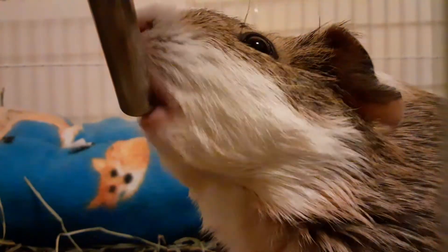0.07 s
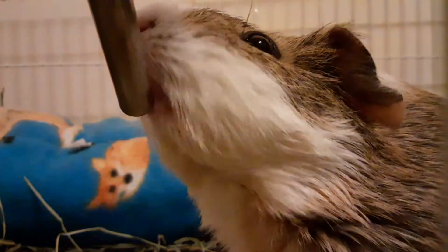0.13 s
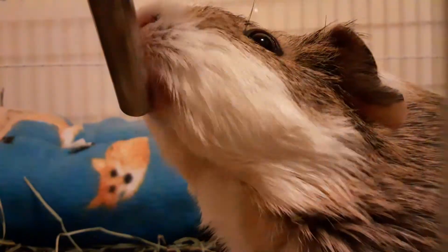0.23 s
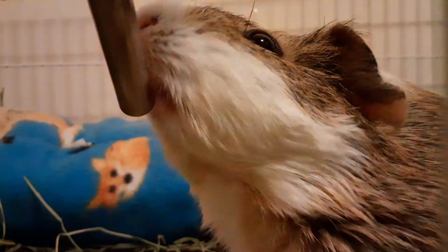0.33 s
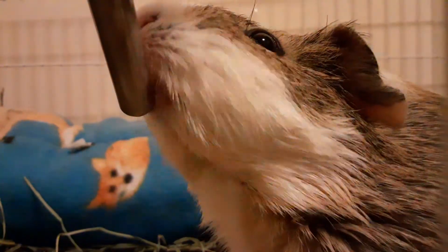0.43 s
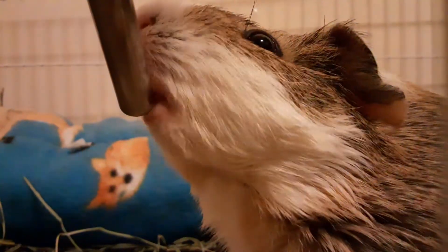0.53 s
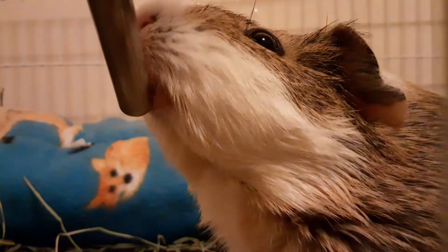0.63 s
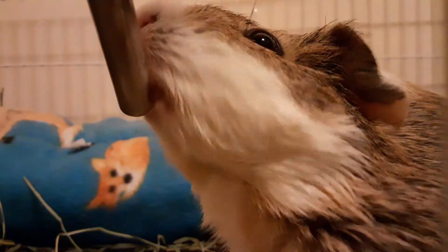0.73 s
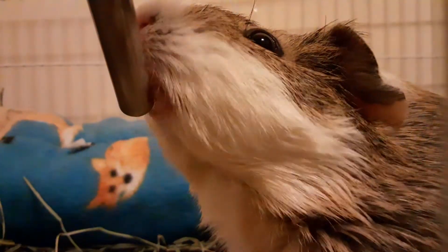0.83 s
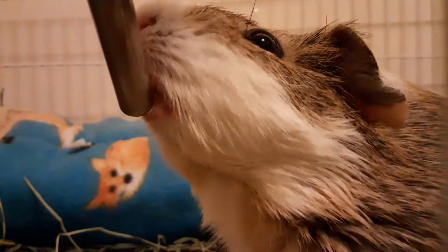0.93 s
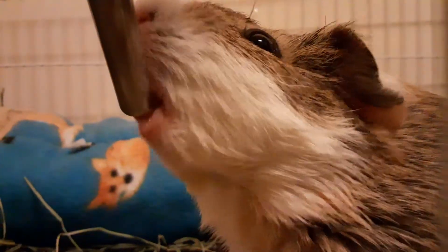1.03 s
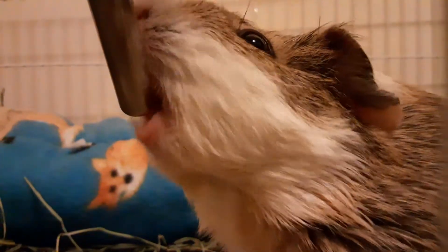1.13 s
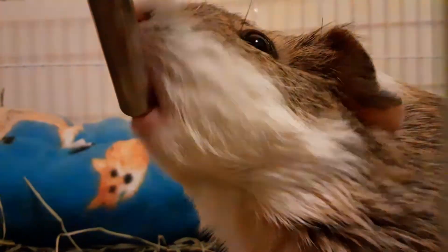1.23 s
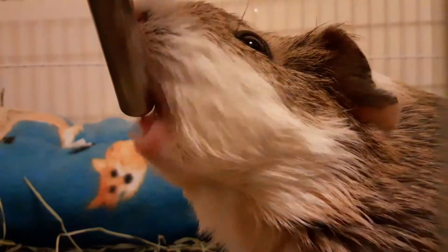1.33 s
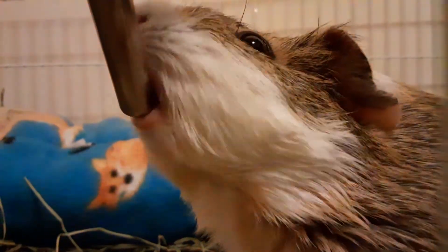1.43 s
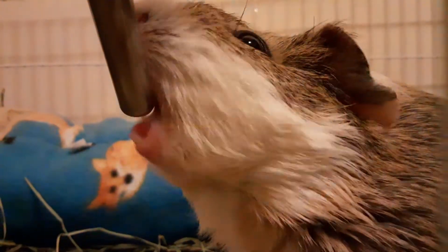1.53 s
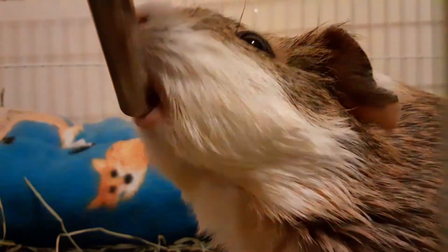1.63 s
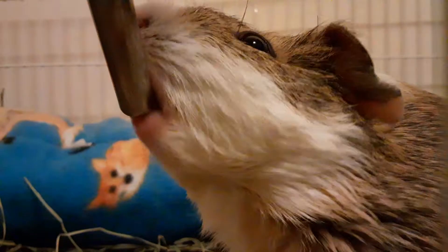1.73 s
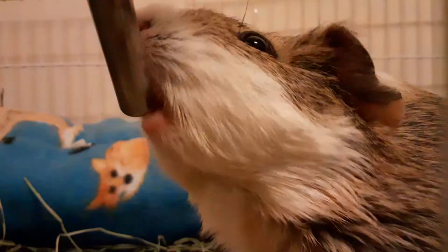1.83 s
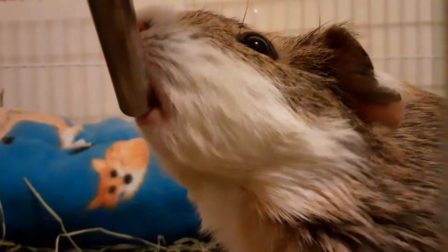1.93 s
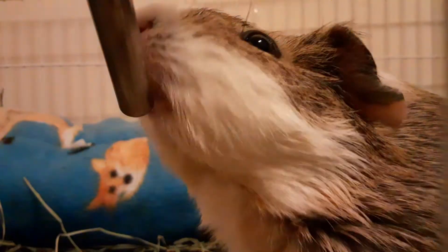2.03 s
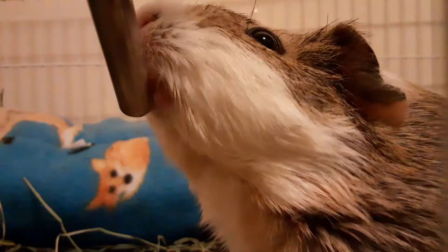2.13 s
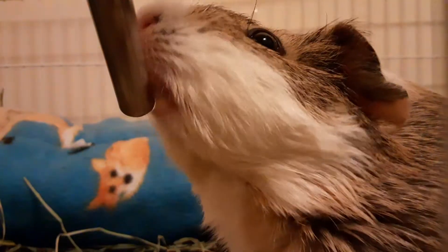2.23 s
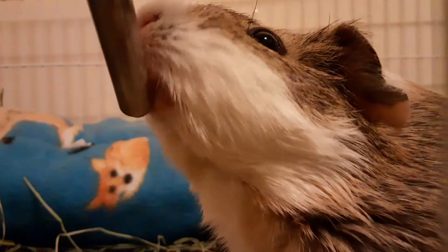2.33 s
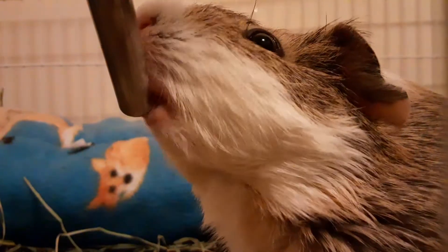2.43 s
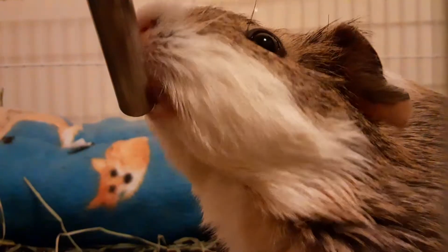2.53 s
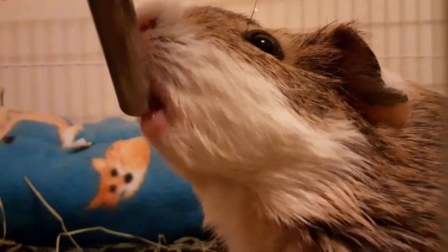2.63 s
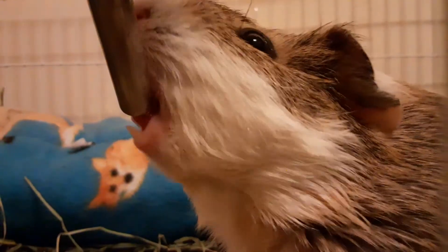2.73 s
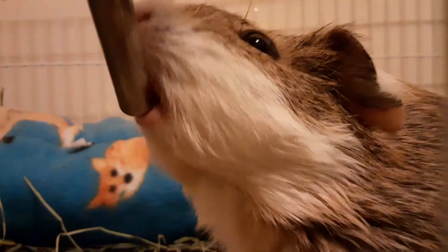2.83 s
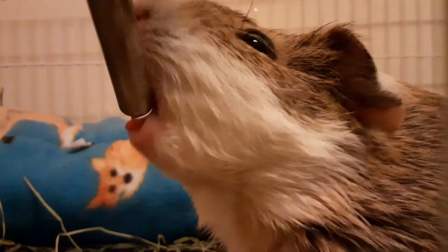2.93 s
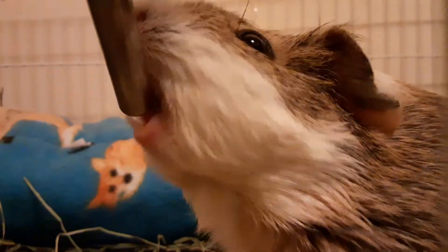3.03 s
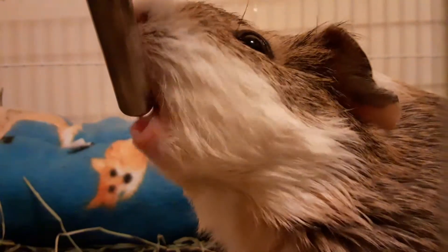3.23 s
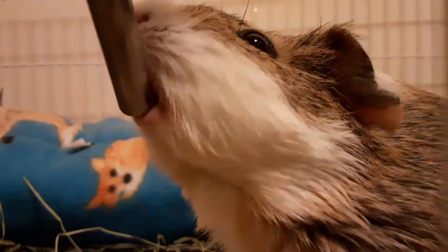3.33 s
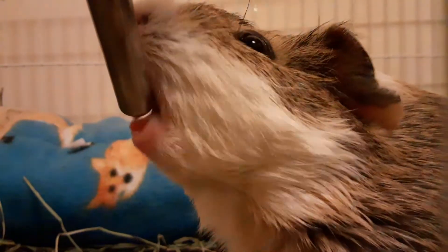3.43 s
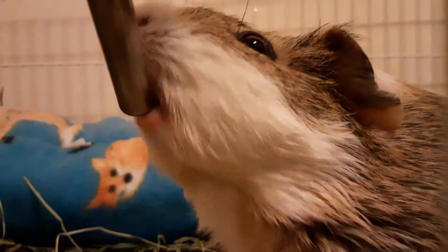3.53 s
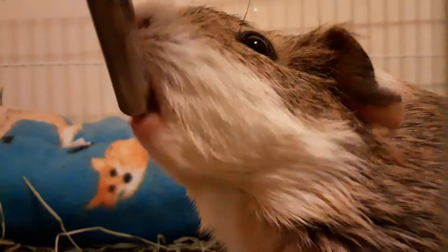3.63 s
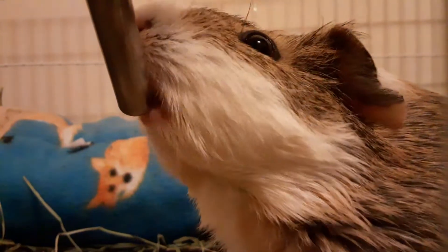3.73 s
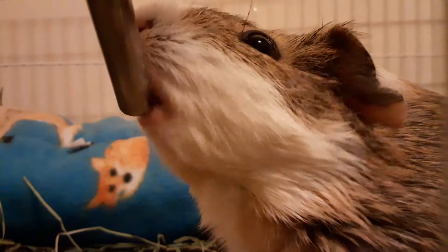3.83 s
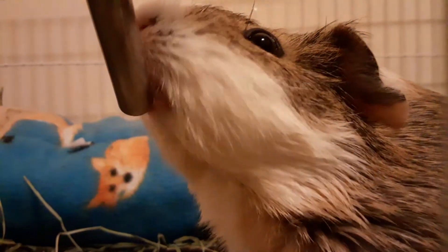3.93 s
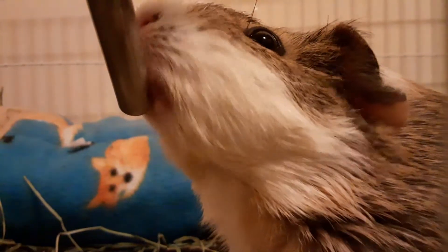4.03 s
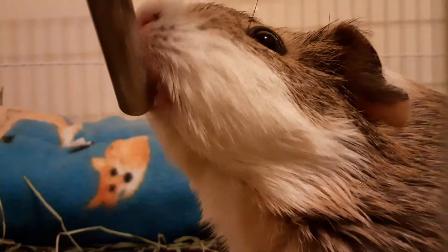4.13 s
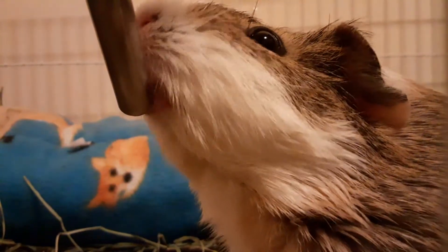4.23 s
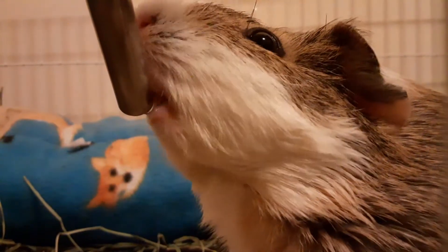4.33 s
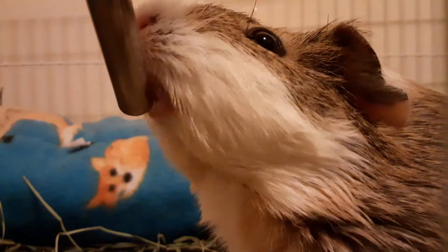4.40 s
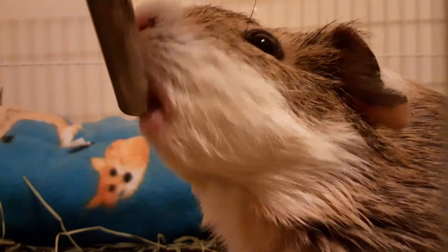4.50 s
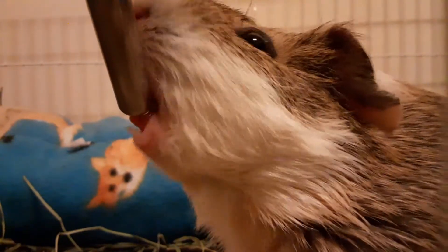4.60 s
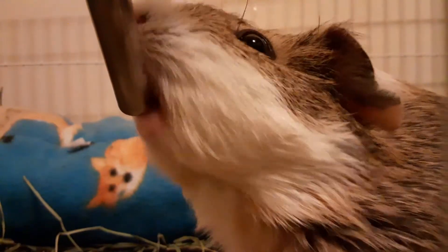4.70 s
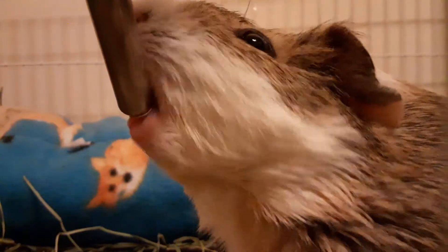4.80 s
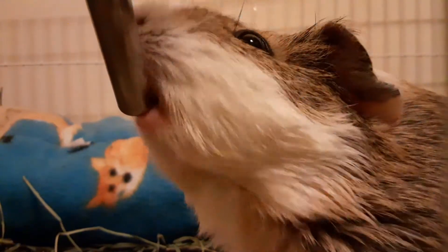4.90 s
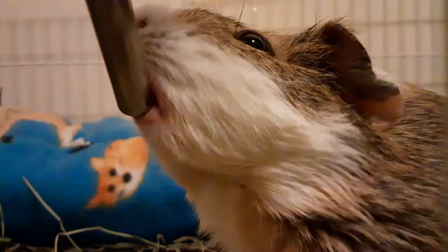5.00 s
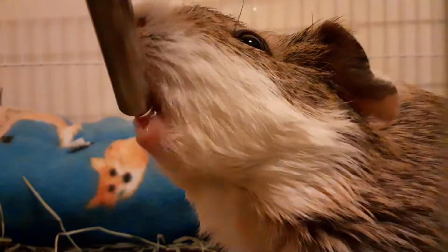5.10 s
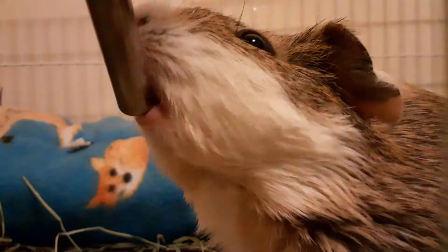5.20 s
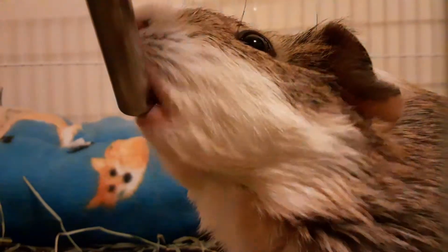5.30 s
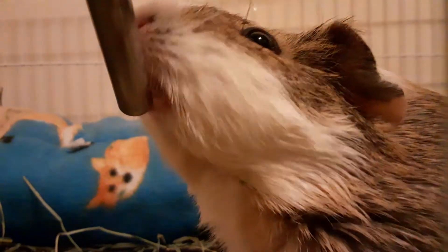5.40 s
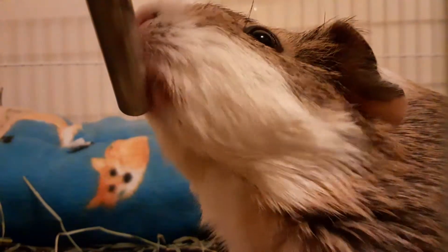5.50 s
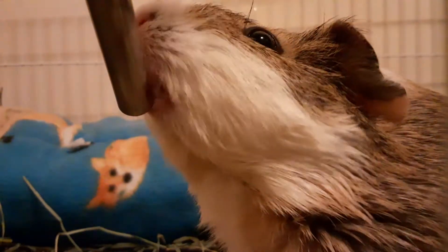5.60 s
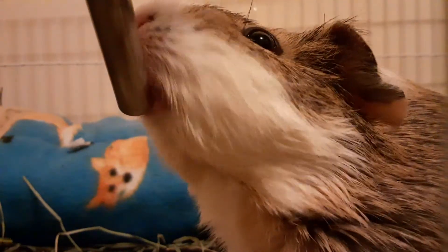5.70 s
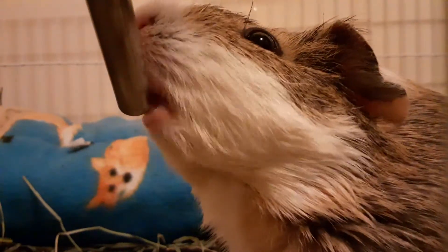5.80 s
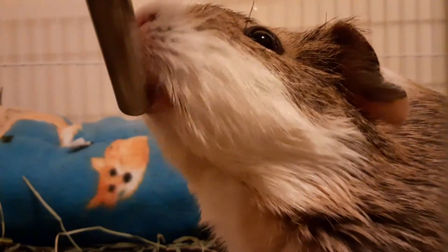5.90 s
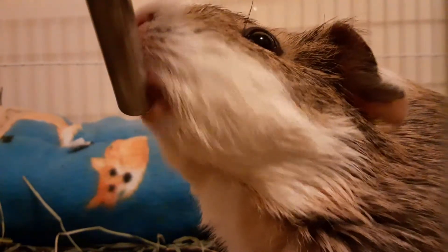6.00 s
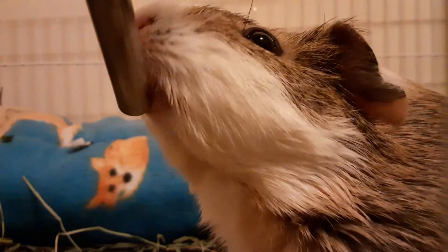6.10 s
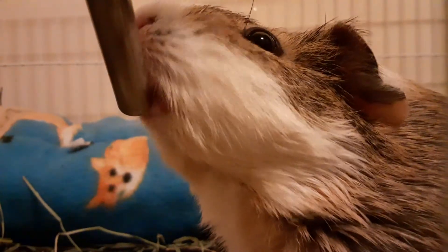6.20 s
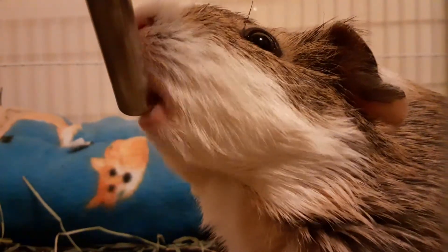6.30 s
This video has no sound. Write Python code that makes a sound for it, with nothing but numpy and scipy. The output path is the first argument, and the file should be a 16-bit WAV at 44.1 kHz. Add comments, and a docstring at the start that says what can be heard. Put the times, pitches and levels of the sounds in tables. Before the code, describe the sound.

A guinea pig drinks from the steel spout of a water bottle in its cage, close and slightly left, in a small quiet room with faint steady room tone. A few light ticks sound right at the start. From about 1.1 to 2 seconds comes a burst of rapid clicking, around nine strokes a second: wet licks lift the valve ball, which rattles and snaps shut, while strokes in between knock the spout with sharp double clacks. Tiny high bubble pings mix in, and the cage hums faintly after each contact. After a pause, a second burst runs from 2.8 to 3.8 seconds. A very faint hiss and a few soft, low bumps on the cage floor follow between 3.8 and 4.5 seconds. A third, shorter burst lasts from 4.7 to 5.2 seconds. A few last ticks trail off by 5.4 seconds, with one barely audible tick near 6 seconds.

```python
"""A guinea pig drinks from the steel spout of a water bottle in its cage, nearer the left microphone.
In a small quiet room, mouth and valve ball tick, and the cage hums after each contact. From 1.1 s come
three bursts of about nine strokes a second: wet licks lift the ball, which rattles and falls shut,
tiny bubbles ping, and strokes between the licks knock the spout with a double clack. A faint hiss and
soft bumps on the cage floor follow the second burst; after the third, a few last ticks remain."""
import sys
import numpy as np
from scipy import signal
from scipy.fft import rfft, irfft, next_fast_len
from scipy.io import wavfile

SR = 44100
rng = np.random.default_rng(int(sys.argv[2]) if len(sys.argv) > 2 else 0)


def generate_wav(sig):
    """Save sig (samples, or channels by samples) to the path in sys.argv[1] as 16-bit PCM at SR."""
    pcm = np.round(np.clip(np.atleast_2d(sig).T, -1, 1) * 32767).astype(np.int16)
    wavfile.write(sys.argv[1], SR, pcm)


N = 280035
AGE = np.arange(SR // 6) / SR  # seconds since a contact
GRID_HZ = np.fft.rfftfreq(8192, 1 / SR)

# licks, with delays counted from the push that lifts the ball:
# start_s, push_db, thud_db, rattle_delay_s, rattle_db, seat_delay_s, seat_db, film_length_s, film_db
LICKS = [(1.1648, 6.5, -6, .0143, -1, .0313, 2, .065, -42),
         (1.388, 6.5, -7, .012, -5, .0339, 1, .055, -41.5),
         (1.5982, 2.5, -9, .0162, -7, .0275, -6.5, .12, -43.5),
         (1.8355, 4, -7, .0114, -11, .0289, -5, .09, -45), (2.801, 5, -7.5, .0151, 1, .0317, 1, .12, -48),
         (3.0601, 2, -6, .0125, -8, .03, -20, .075, -42), (3.2818, 3, -6, .017, -2, .0292, 1.5, .12, -51),
         (3.5085, 3, -7, .014, -22, .0378, -1.5, .12, -56),
         (3.7063, 0, -11, .019, -10, .0365, -10, .095, -40.5),
         (4.6941, .5, -6.5, .0101, -3, .0303, 1, .035, -50),
         (4.8902, 4.5, -4, .0142, -2, .0289, 2, .12, -55), (5.1603, 3, -6, .0131, -8, .0369, 0, .07, -60)]
# resonances of spout and holder: pitch_hz, width_hz, rise_db
SPOUT_MODES = [(1035, 50, 7), (1370, 70, 8), (1560, 70, 4), (1725, 60, 6), (1950, 110, 6), (2540, 100, 6),
               (2950, 35, 6), (3125, 60, 7), (3225, 40, 6), (3560, 130, 5), (4040, 60, 4), (4230, 130, 4),
               (4470, 60, 5), (4760, 100, 4), (5080, 60, 4), (5450, 90, 7), (6060, 60, 7), (6370, 80, 6),
               (6580, 70, 5), (6870, 100, 4), (7600, 130, 3), (8640, 130, 6)]
# the steel tube's close pair of modes: pitch_hz, width_hz, level_db
TUBE_MODES = [(10180, 170, -3), (10390, 110, 0)]
# spectrum of a bright snap on steel: frequency_hz, level_db
SNAP_SPECTRUM = [(3000, -32.5), (7000, -7), (9500, -4.5), (11150, -7.5), (11800, -5), (12500, -11.5),
                 (13200, -1.5), (14100, 1), (14700, -5), (15600, -2), (16500, -12)]
# spectrum of a light tap on the spout: frequency_hz, level_db
TAP_SPECTRUM = [(30, -26), (70, -8.5), (200, 1), (950, -5.5), (1200, -3), (1450, 4.5), (2000, 1), (2650, 0),
                (3500, -2.5), (5000, -4), (7000, -7), (11500, -17.5)]


def amp(db):
    """Decibels to amplitude ratio."""
    return 10 ** (np.asarray(db) / 20)


def unit_rms(x):
    """Normalisation to rms 1."""
    return x / np.sqrt(np.mean(x ** 2) + 1e-20)


def unit_energy(x):
    """Normalisation to energy 1."""
    return x / np.sqrt(np.sum(x ** 2) + 1e-20)


def curve_at(points, hz):
    """Interpolation of (frequency_hz, value) points on a logarithmic frequency axis."""
    frequencies, values = np.transpose(points)
    return np.interp(np.log(hz + 1), np.log(frequencies), values)


def add(track, start_s, sound):
    """Superposition: a stereo sound is summed into a track."""
    part = track[:, max(0, round(start_s * SR)):][:, :sound.shape[1]]
    part += sound[:, :part.shape[1]]


def through(x, response):
    """Convolution of a stereo sound with an impulse response."""
    return signal.oaconvolve(x, response[None], axes=1)[:, :x.shape[1]]


def colour(spectrum, resonances=()):
    """Minimum-phase impulse response of a broad spectrum with resonant peaks on it."""
    peaks_db = sum(db / (1 + (2 * (GRID_HZ - hz) / width) ** 2) for hz, width, db in resonances)
    cepstrum = irfft(np.log(amp(curve_at(spectrum, GRID_HZ) + peaks_db)))
    half = len(cepstrum) // 2
    cepstrum[1:half] *= 2  # folding the cepstrum makes the response causal
    cepstrum[half + 1:] = 0
    return unit_energy(irfft(np.exp(rfft(cepstrum)))[:half])


def ringing(modes):
    """Modal impulse response: damped sinusoids of alternating sign, the wider ones dying sooner."""
    return unit_energy(sum(
        (-1) ** k * amp(db) * width * np.exp(-np.pi * width * AGE) * np.sin(2 * np.pi * hz * AGE)
        for k, (hz, width, db) in enumerate(modes)))


def reflections(t60, attack_s):
    """Diffuse field: uneven reflections build up, then decay exponentially."""
    swarm = rng.standard_normal((2, len(AGE))) * amp(5 * rng.standard_normal((2, len(AGE))))
    return unit_energy(swarm * amp(-60 * AGE / t60) * (1 - np.exp(-AGE / attack_s)))


def contact(scatter_db, scatter_t60, right_db, room_db, room_t60):
    """An impulse arrives as direct sound, scatter from nearby surfaces and reverberation."""
    near = amp(scatter_db) * reflections(scatter_t60, attack_s=0.0001)
    near[0, 2] += 1  # only the left microphone faces the spout
    shaded = 0.3 * near[0] + 1.15 * near[1]
    near[1] = amp(right_db) * np.pad(shaded, (12, 0))[:len(AGE)]  # 12 samples later on the right
    return unit_energy(near) + amp(room_db) * reflections(room_t60, attack_s=0.002) * amp([[1], [-1]])


def room_tone(level_db=-54):
    """Partly coherent noise: a steady low room sound with thin microphone hiss on top."""
    # noise floor: frequency_hz, level_db
    spectrum = [(30, -29), (55, -11), (130, -5.5), (260, -4.5), (345, 2.5), (410, -4), (620, -7.5),
                (1150, -13), (1750, -8.5), (4500, -24), (7500, -38), (9600, -35.5), (12000, -24),
                (15700, -21)]
    # likeness of left and right: frequency_hz, correlation
    coherence = [(60, 0.67), (130, 0.86), (290, 0.49), (640, 0.19), (1400, -0.13), (3000, -0.029)]
    # stereo balance: frequency_hz, left_minus_right_db
    balance = [(60, 6.5), (200, 1.5), (700, 1), (2400, -2), (8000, 1), (15000, -5)]
    size = next_fast_len(N + SR // 4)
    hz = np.fft.rfftfreq(size, 1 / SR)
    angle = np.arccos(np.clip(curve_at(coherence, hz), -1, 1)) / 2
    noise = rfft(rng.standard_normal((2, size))) * amp(curve_at(spectrum, hz))
    mid, side = noise * [np.cos(angle), np.sin(angle)]
    lean = amp(curve_at(balance, hz) / 2)
    return amp(level_db) * unit_rms(irfft([(mid + side) * lean, (mid - side) / lean], size)[:, :N])


def ball_touches():
    """Impact and rebound of the loose ball, as rows of start_s, snap_db, body_db, ring_db."""
    # single ticks of mouth and ball: start_s, snap_db, body_db
    stray_ticks = [(.0051, -2.5, -16), (0.0273, -12, -11), (0.0918, -34, -24), (.1186, -15, -12),
                   (0.438, -35, -22.5), (1.101, -31, -34), (1.6731, -6.5, -14.5), (1.9236, -20.5, -14.5),
                   (2.006, -18, -16), (2.339, -36, -24), (2.3529, -36, -28), (3.1197, -14.5, -21),
                   (3.584, -9, -15), (3.768, -17.5, -13), (4.2276, -34, -30), (4.6142, -25, -30),
                   (4.9839, -8.5, -15.5), (5.005, -34, -14), (5.0254, -7.5, -6.5), (5.28, -23, -16.5),
                   (5.3347, -34, -21), (5.3625, -13.5, -12.5), (6.026, -37, -36)]
    # the tongue meets the ball, relative to the push: delay_s, snap_db, body_db, ring_db
    approach = [(-.0175, -26, -28, -36), (-.0066, -14, -19.5, -33)]
    # the ball bounces to rest, relative to its seating: delay_s, snap_db, body_db, ring_db
    settling = [(0.0117, -9.5, -21.5, -17), (.043, -22, -26.5, -33)]
    rows = [(s, snap_db, body_db, snap_db - 12) for s, snap_db, body_db in stray_ticks]
    for s, push_db, _, rattle_s, rattle_db, seat_s, seat_db, *_ in LICKS:
        rows.append((s + rattle_s, rattle_db - 1.5, rattle_db - 12.5, rattle_db - 11))  # hits the wall
        rows.append((s + seat_s, seat_db - 0.5, seat_db - 4, seat_db - 4))  # falls shut on its seat
        for start_s, db, light_touches in [(s, push_db, approach), (s + seat_s, seat_db, settling)]:
            for delay_s, *parts_db in light_touches:
                late_share, harder_db = rng.standard_normal(2) * [0.06, 2.7]
                rows.append((start_s + delay_s * (1 + late_share), *np.add(db + harder_db, parts_db)))
    return rows


def wet_snap(excitation):
    """Variable resonance: the water film on the ball lifts a new pitch in the snap at every touch."""
    film_mode = (rng.uniform(12000, 15300), 450, 8)
    return through(excitation, colour(SNAP_SPECTRUM, [film_mode]))


def tube_ring(excitation):
    """Loading: water and lips shift the pitch and strength of the tube's modes from touch to touch."""
    detune = 1 + 0.009 * rng.standard_normal()
    gain = amp(2.2 * rng.standard_normal() - 0.5)
    modes = [(hz * detune, width, db + 3 * rng.standard_normal()) for hz, width, db in TUBE_MODES]
    return gain * through(excitation, ringing(modes))


def valve_ball(touches):
    """Impact excitation: each touch of the ball snaps brightly, rings the tube and taps the spout."""
    steel, taps = np.zeros((2, 2, N))
    for s, snap_db, body_db, ring_db in touches:
        snap = contact(scatter_db=-1, scatter_t60=0.016, right_db=-6.5, room_db=-17, room_t60=0.2)
        ring = contact(scatter_db=-2.5, scatter_t60=0.0017, right_db=4, room_db=-8.5, room_t60=0.09)
        add(steel, s, amp(snap_db + 1.4) * wet_snap(snap) + amp(ring_db + 1.5) * tube_ring(ring))
        tap = contact(scatter_db=1, scatter_t60=0.026, right_db=-6.5, room_db=-7.5, room_t60=0.18)
        add(taps, s, amp(body_db) * tap)
    return steel + amp(1) * through(taps, colour(TAP_SPECTRUM, SPOUT_MODES))


def cage_hum(touches):
    """Structure-borne sound: contacts pass through the holder to the cage, whose low modes linger."""
    # hollow modes of the cage: pitch_hz, width_hz, level_db
    cage_modes = [(139, 53, -2.5), (235, 36, -1), (284.4, 19.6, 2.5), (362.5, 20, 5), (459, 29, -1.5)]
    shake = np.zeros((2, N))
    for s, _, body_db, *_ in [*pushes(), *touches]:
        add(shake, s, amp(body_db - 11) * reflections(t60=0.11, attack_s=0.0044))
    for s, body_db, _ in strikes():
        add(shake, s, amp(body_db - 13.5) * reflections(t60=0.22, attack_s=0.002))
    shake[1] = 0.84 * shake[0] + 0.62 * shake[1]  # long waves reach both microphones much alike
    return through(shake, ringing(cage_modes)) * amp([[0.8], [-0.8]])


def tongue_crackle(pops_per_s=480, lead_s=0.022):
    """Shot noise: the water film breaks in tiny random pops, starting just before each push."""
    film = np.zeros((2, N))
    for s, *_, length_s, db in LICKS:
        size = int(np.clip(length_s * SR, 2, len(AGE)))
        strength = amp(6 * rng.standard_normal(len(AGE))) * rng.choice([-1, 1], len(AGE))
        pops = (rng.random(len(AGE)) < pops_per_s / SR) * strength
        wet = signal.fftconvolve(pops[None], reflections(t60=0.007, attack_s=0.0001), axes=1)[:, :size]
        add(film, s - lead_s, amp(db) * unit_rms(wet) * signal.windows.tukey(size, 0.4))
    body = amp(-3) * through(film, colour(TAP_SPECTRUM, SPOUT_MODES))
    bright = amp(-6) * through(film, colour(SNAP_SPECTRUM))
    return (body + bright) * amp([[1.5], [-2.5]])


def pushes():
    """Paired impulses: a lick lifts the ball, then flicks it; rows of start_s, snap_db, body_db."""
    return [row for s, push_db, thud_db, rattle_s, rattle_db, *_ in LICKS
            for row in [(s, push_db, thud_db), (s + rattle_s, rattle_db - 7, rattle_db - 22.5)]]


def ball_pushes():
    """Damped impact: the tongue lifts the ball with a snap and a thud while the mouth damps the tube."""
    # snap of the ball pushed open: frequency_hz, level_db
    snap_spectrum = [(4000, -24), (7300, -34), (8600, -7), (11100, -14.5), (12400, 1), (13200, -0.5),
                     (13900, -0.5), (14700, 2), (15600, -6.5), (16500, -6)]
    # thud under that snap: frequency_hz, level_db
    thud_spectrum = [(30, -33), (60, 0), (140, -2.5), (300, 2), (950, -2), (1400, -0.5), (2300, -7.5),
                     (2750, 4.5), (3300, -32), (5500, -10), (6500, 3), (7400, -18.5), (11000, -28)]
    snaps, thuds = np.zeros((2, 2, N))
    for s, snap_db, body_db in pushes():
        snap = contact(scatter_db=-7, scatter_t60=0.0038, right_db=-8.5, room_db=-15.5, room_t60=0.068)
        thud = contact(scatter_db=-1.5, scatter_t60=0.007, right_db=-6, room_db=-12, room_t60=0.17)
        add(snaps, s, amp(snap_db) * snap)
        add(thuds, s, amp(body_db) * thud)
    bright = amp(5.5) * through(snaps, colour(snap_spectrum))
    ring = amp(-12.5) * through(snaps, ringing(TUBE_MODES))
    return bright + ring + amp(2) * through(thuds, colour(thud_spectrum, SPOUT_MODES))


def bubbles(t60=0.068, sag_per_s=0.76):
    """Bubble resonance: trapped air pings, sinking a little in pitch as it fades."""
    # tiny bubbles in the wet tip: start_s, pitch_hz, level_db
    pings = [(1.24, 13000, -40), (1.273, 13300, -30), (1.716, 16000, -23), (1.83, 12100, -37),
             (1.88, 12950, -34), (3.119, 13100, -43), (3.626, 12400, -24.5), (3.743, 12350, -38)]
    water = np.zeros((2, N))
    for s, hz, db in pings:
        phase = 2 * np.pi * np.cumsum(hz * (1 - sag_per_s * AGE)) / SR
        add(water, s, amp(db - 60 * AGE / t60) * np.sin(phase) * amp([[0], [-7]]))
    return water


def strikes():
    """Double impact: the spout strikes again, lighter and brighter; rows of start_s, body_db, snap_db."""
    # knocks on the spout: start_s, gap_s, body_db, snap_db
    clacks = [(1.273, 0.0065, 3, 1), (1.4873, 0.006, 0, 3), (1.716, 0.0079, 0, 2.5),
              (2.9058, 0.0071, 3.5, 0), (3.1733, 0.0076, 0.3, 0.5), (3.3934, .0056, 2.7, 2.5),
              (3.626, .0079, -1.5, -2), (4.7895, 0.0063, 3.5, 3.5)]
    return [row for s, gap_s, body_db, snap_db in clacks
            for row in [(s, body_db, snap_db), (s + gap_s, body_db - 2, snap_db + 3)]]


def knocked_spout(rise_scale=0.81, spread_db=3):
    """Modal excitation: where the spout is hit decides how strongly each resonance answers."""
    # a hard knock on the spout: frequency_hz, level_db
    knock_spectrum = [(30, -4), (70, -14), (200, -7.5), (900, -10.5), (1180, -9.5), (1400, -0.5),
                      (3000, -5.5), (5500, -6), (6800, -8.5), (7800, -23), (9500, -18), (11500, -16)]
    modes = [(hz, width, rise_scale * db + spread_db * rng.standard_normal())
             for hz, width, db in SPOUT_MODES]
    return colour(knock_spectrum, modes)


def spout_clacks():
    """Free vibration: hard knocks shake the whole spout and its holder, and fill the room more."""
    steel, knocks = np.zeros((2, 2, N))
    for s, body_db, snap_db in strikes():
        snap = contact(scatter_db=14, scatter_t60=0.014, right_db=-7.5, room_db=-13.5, room_t60=0.15)
        add(steel, s, amp(snap_db - 3.5) * wet_snap(snap) + amp(snap_db - 13) * tube_ring(snap))
        blow = contact(scatter_db=7.5, scatter_t60=0.019, right_db=-6.5, room_db=-5.5, room_t60=0.17)
        add(knocks, s, amp(body_db) * through(blow, knocked_spout()))
    return steel + amp(0.5) * knocks


def soft_hiss(start_s=3.83, length_s=0.2, level_db=-63):
    """Filtered noise: a faint high hiss swells and fades after the second burst."""
    hiss, size = np.zeros((2, N)), int(length_s * SR)
    add(hiss, start_s, amp(level_db) * rng.standard_normal((2, size)) * signal.windows.hann(size))
    return through(hiss, colour([(4000, 1), (9000, 12), (12500, 13), (16000, -16)]))


def floor_bumps(t60=0.04, attack_s=0.0041):
    """Heavily damped oscillation: the cage floor answers each soft bump with one dull, low tone."""
    # bumps on the cage floor: start_s, pitch_hz, level_db
    bumps = [(3.946, 132, -44), (3.973, 111, -48), (4.445, 270, -43.5)]
    floor = np.zeros((2, N))
    for s, hz, db in bumps:
        thud = np.sin(2 * np.pi * hz * AGE) * amp(-60 * AGE / t60) * (1 - np.exp(-AGE / attack_s))
        add(floor, s, amp(db) * thud / thud.max() * amp([[1.5], [-2.5]]))
    return floor


def scene():
    """Superposition of the quiet room and the sounds of the drinking animal."""
    touches = ball_touches()
    return (room_tone() + valve_ball(touches) + cage_hum(touches) + tongue_crackle() + ball_pushes()
            + bubbles() + spout_clacks() + soft_hiss() + floor_bumps())


def record(dry):
    """Band limiting and soft saturation: deep bass and top treble are cut, the tallest peaks rounded."""
    low_hz, top_hz, ceiling = 42, 16100, 0.66
    trimmed = signal.sosfilt(signal.butter(2, low_hz, "highpass", fs=SR, output="sos"), dry)
    rounded = trimmed / (1 + np.abs(trimmed / ceiling) ** 6) ** (1 / 6)
    return signal.fftconvolve(rounded, signal.firwin(255, top_hz, fs=SR)[None], mode="same", axes=1)


dry = scene()
out = record(dry)
generate_wav(out)
```